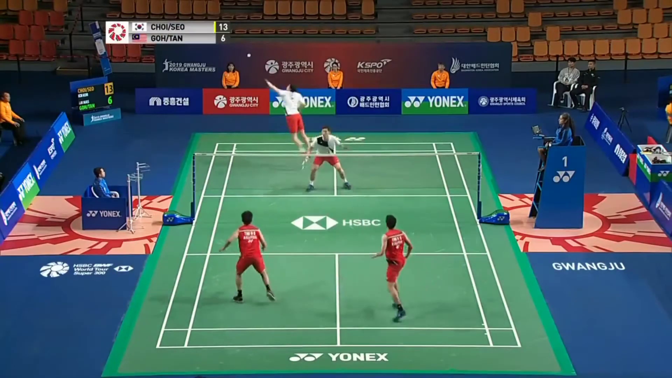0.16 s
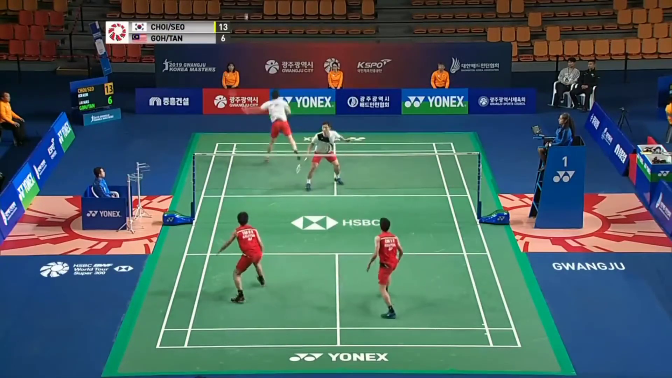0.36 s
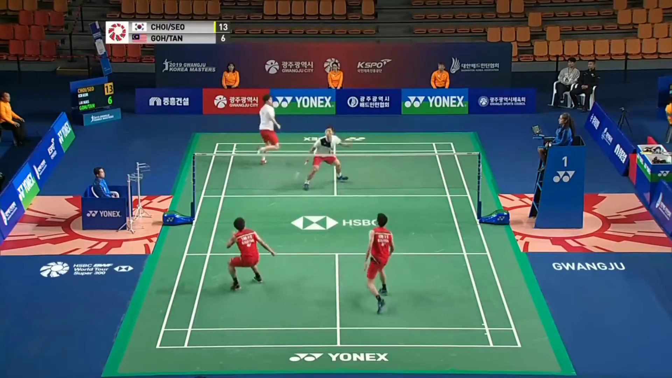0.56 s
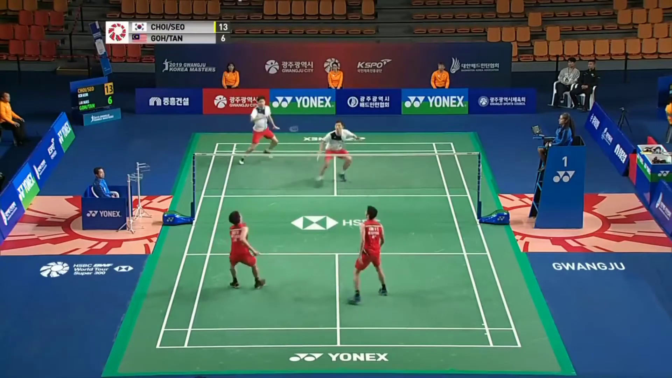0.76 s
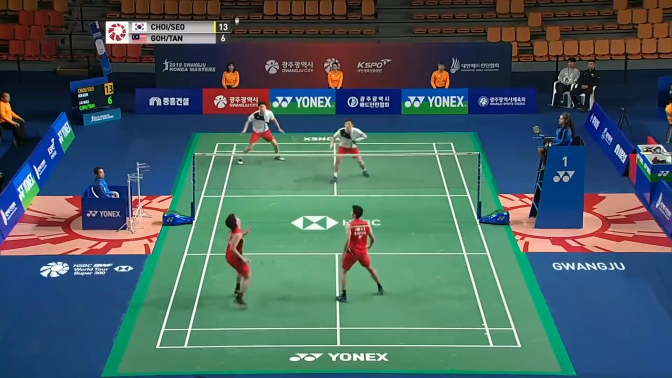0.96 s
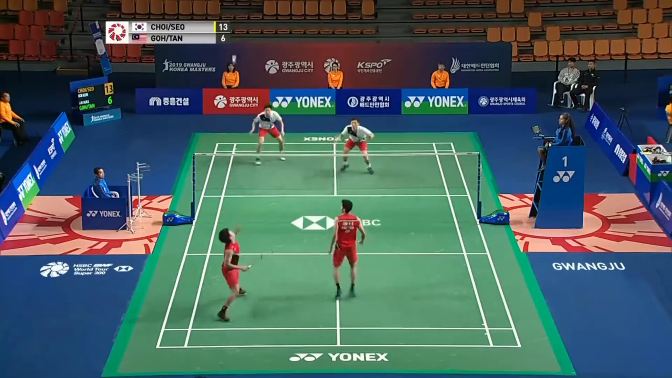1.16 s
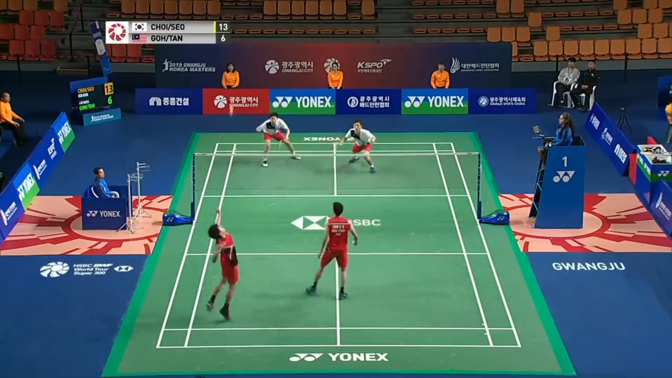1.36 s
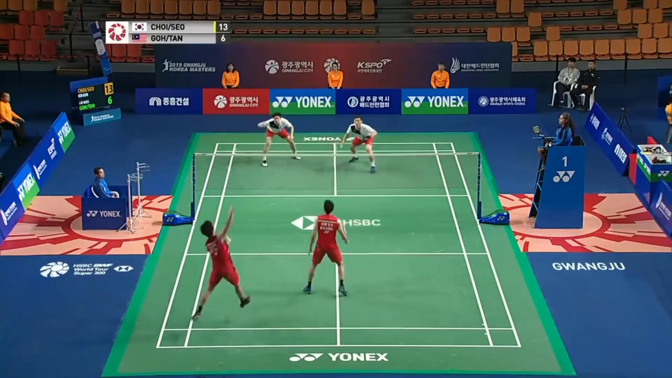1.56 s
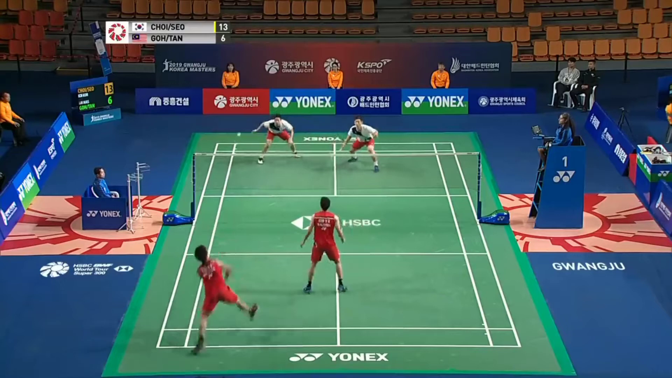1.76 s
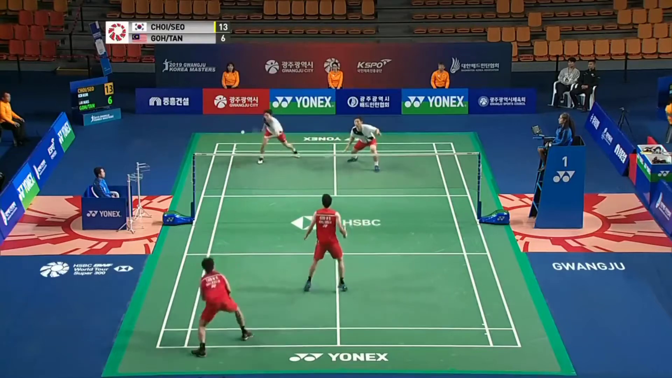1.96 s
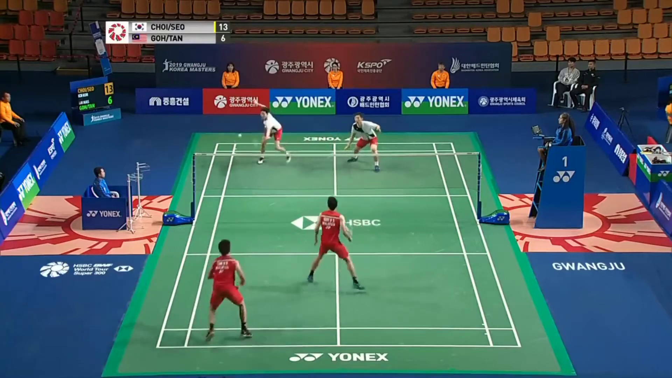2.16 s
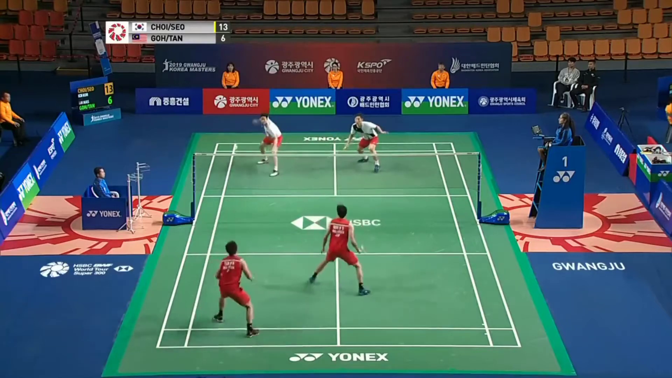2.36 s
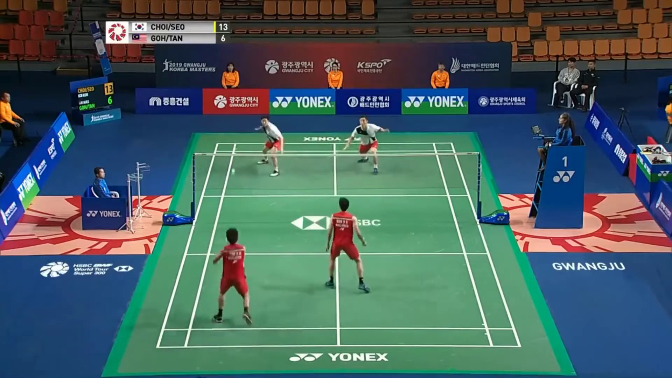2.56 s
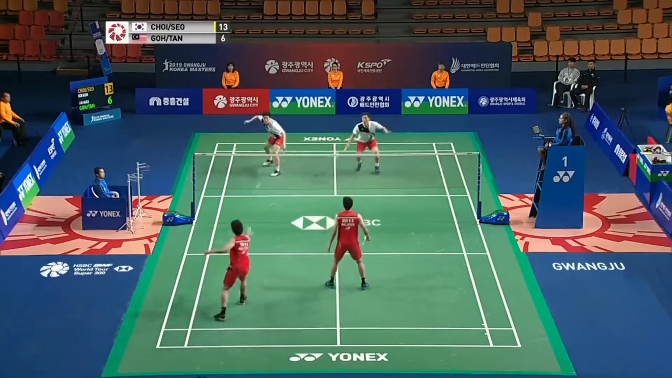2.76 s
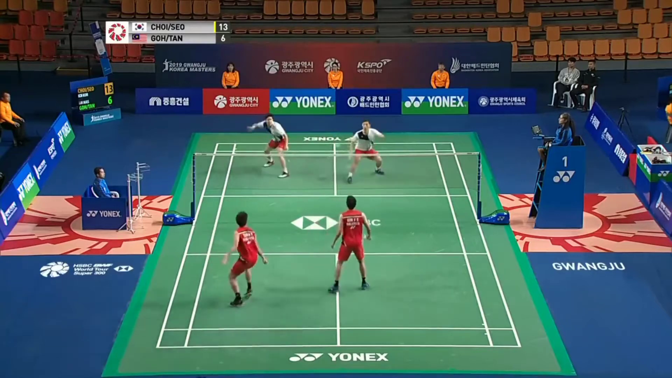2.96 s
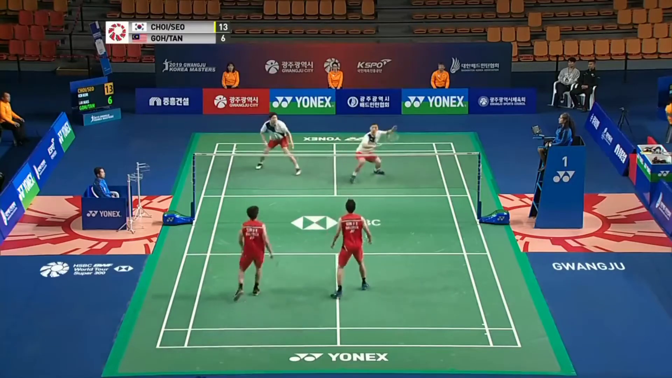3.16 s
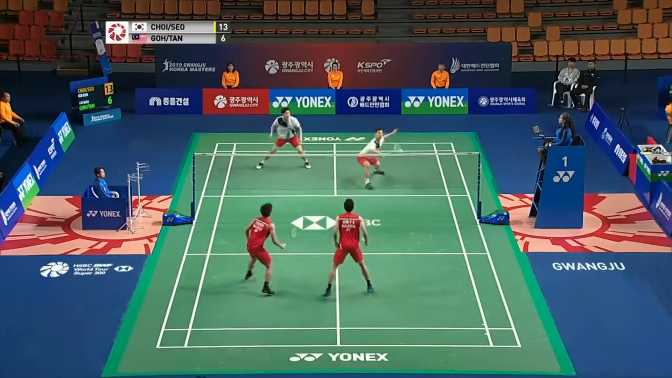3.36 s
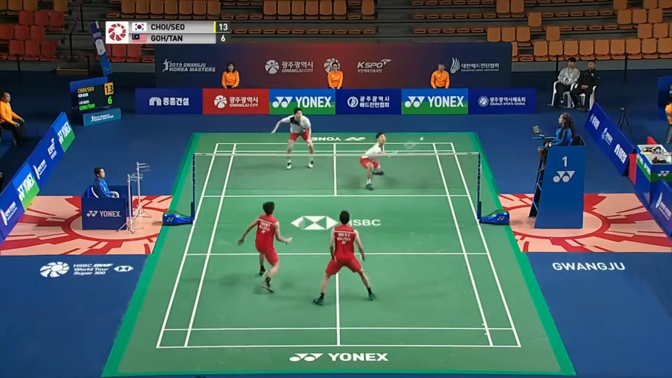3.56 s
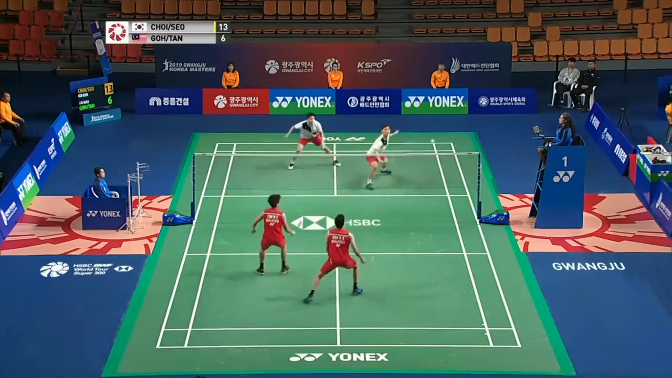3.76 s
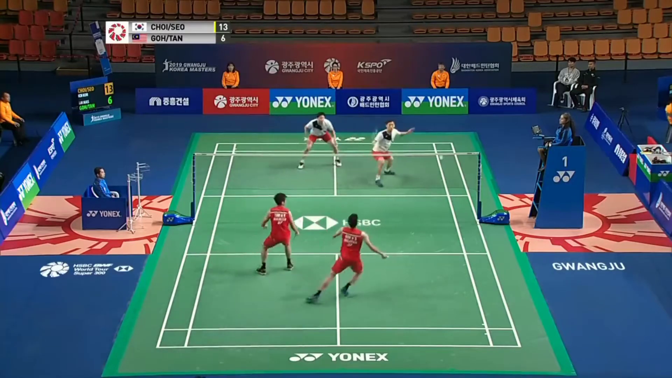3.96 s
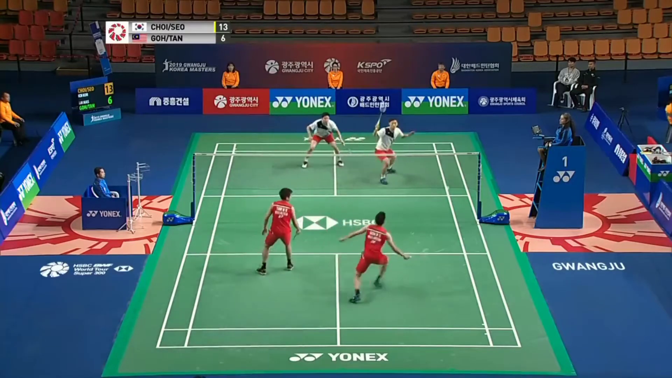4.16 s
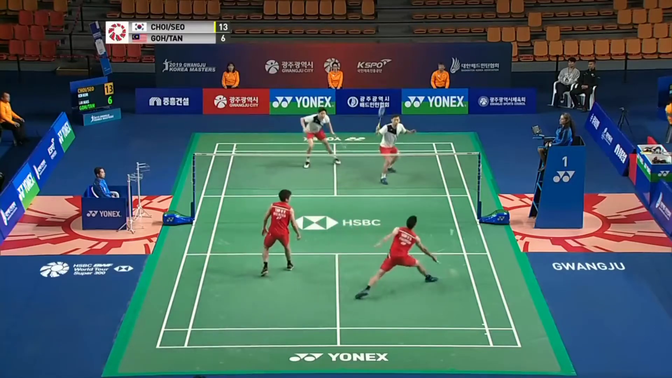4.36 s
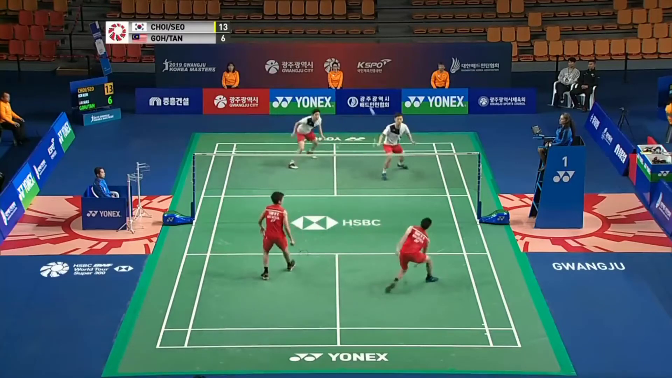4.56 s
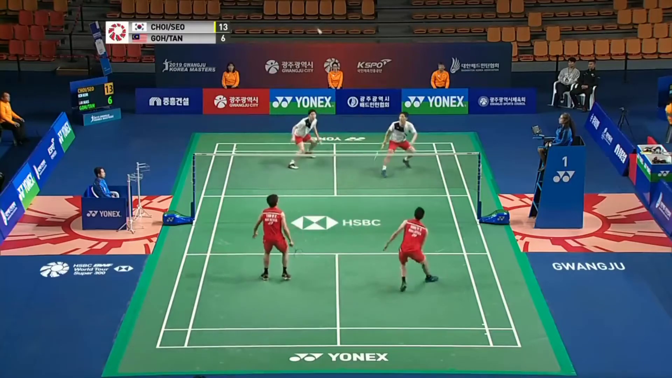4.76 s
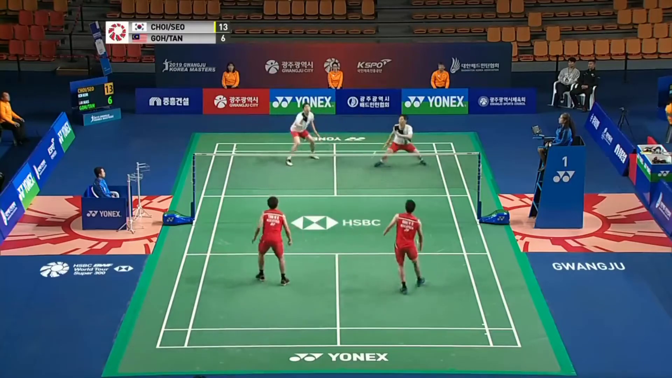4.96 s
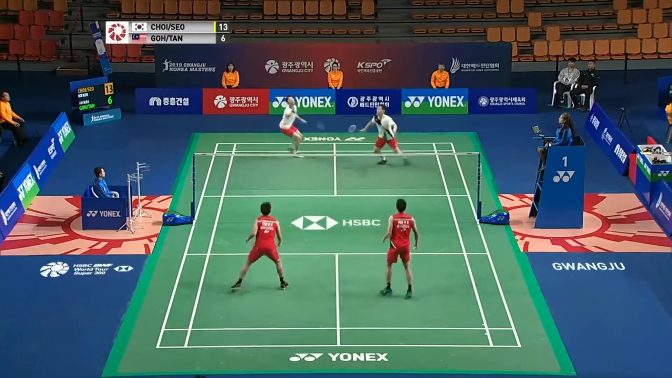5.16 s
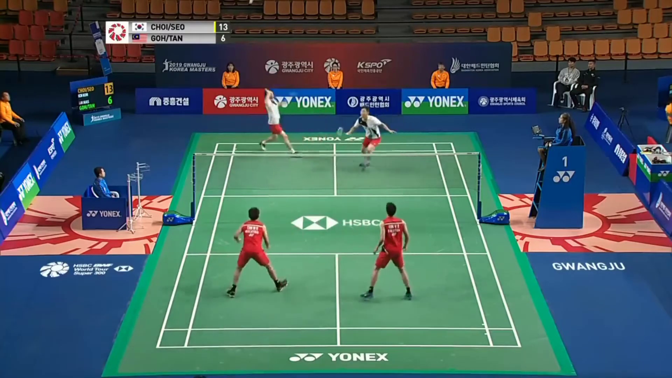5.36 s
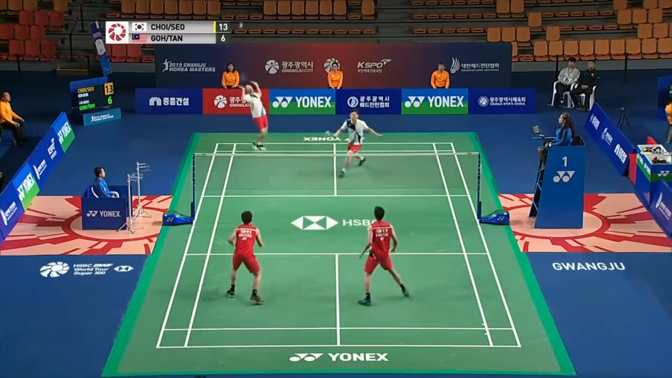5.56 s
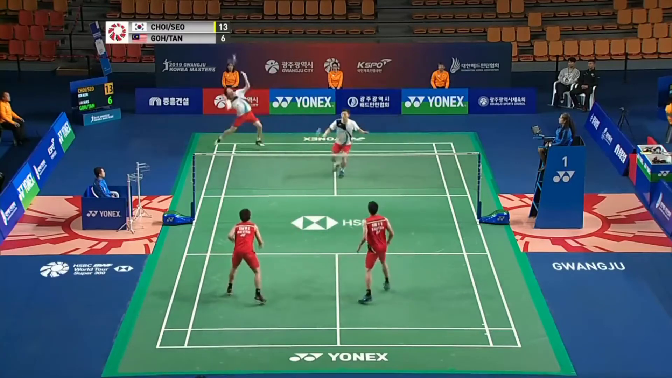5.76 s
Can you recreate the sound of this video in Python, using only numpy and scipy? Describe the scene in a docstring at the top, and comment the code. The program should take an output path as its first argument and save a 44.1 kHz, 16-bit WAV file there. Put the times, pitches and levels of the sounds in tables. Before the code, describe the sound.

Badminton rackets crack against a shuttlecock in a big reverberant hall, one stroke much louder, with shoe squeaks and light footfalls between.

```python
"""A large arena: a fast badminton doubles rally, heard by two court-side microphones mixed to mono.
Strokes crack, thump the frame and ring the strings, then sound again some 20 ms later at the far microphone.
Some swings whistle, as noise gliding upward; squeaks, footfalls and small clicks, some perhaps strokes echoed
off the walls, sound at both microphones in turn. Filtered noise makes the scuffs, floor booms and far knocks;
a diffuse noise tail is the hall's answer, and steady noise the soft ventilation rumble."""
import sys
import numpy as np
from scipy import signal
from scipy.fft import rfft, irfft
from scipy.io import wavfile

SR = 44100
rng = np.random.default_rng(int(sys.argv[2]) if len(sys.argv) > 2 else 0)


def wav_record(signal):
    """Record a signal, one row per channel, as 16-bit PCM in the file named by sys.argv[1]."""
    frames = np.transpose(np.atleast_2d(signal))
    bounded = np.clip(frames, -1, 1)
    # unit amplitude maps onto the largest positive 16-bit level
    quanta = np.round(bounded * 32767).astype(np.int16)
    wavfile.write(sys.argv[1], SR, quanta)


N = 255817
T = np.arange(int(.4 * SR)) / SR  # time within one short sound (s)


def undb(db):
    """Decibels to gain."""
    return np.exp(np.asarray(db) * np.log(10) / 20)


def add(track, s, sound):
    """Mix a sound into a track from time s on, trimmed to the track."""
    start = int(round(s * SR))
    lo, hi = max(start, 0), min(start + len(sound), N)
    track[lo:hi] += sound[lo - start:hi - start]


def delayed(x, s):
    """The same short sound, s later."""
    return np.interp(T - round(s * SR) / SR, T, x, left=0)


def burst(x, db):
    """Give a short sound the energy of 10 ms at this rms level."""
    return x * undb(db) * np.sqrt(.01 * SR / np.sum(x ** 2))


def colour(x, points, tilt_db=0, size=4096):
    """Minimum-phase filter through (f/Hz, level/dB) points, tilted in dB per octave about 1 kHz."""
    octave = np.log2(np.maximum(np.fft.rfftfreq(size, 1 / SR), 10))
    hz, db = np.transpose(points)
    hinge = np.clip(octave - np.log2(1000), -2, 3)  # the tilt levels off below 250 Hz and above 8 kHz
    response_db = np.interp(octave, np.log2(hz), db) + tilt_db * hinge
    cepstrum = irfft(np.log(undb(response_db)))
    # fold the cepstrum onto positive time, so that nothing sounds before the input
    cepstrum[1:size // 2] *= 2
    cepstrum[size // 2 + 1:] = 0
    kernel = irfft(np.exp(rfft(cepstrum)))
    return signal.fftconvolve(x, kernel)[:len(x)]


def fading(t60):
    """Noise that dies away by 60 dB in t60 seconds, with unit energy."""
    x = rng.standard_normal(len(T)) * undb(-60 * T / t60)
    return x / np.sqrt(np.sum(x ** 2))


def wander(knots):
    """A random line drawn through the knot times."""
    return np.interp(T, knots, rng.standard_normal(len(knots)))


def swell(length):
    """A smooth rise and fall that peaks one length in."""
    return np.exp(-2 * (2 * (T - length) / length) ** 2)


def impact(rattle_db, rattle_t60, scatter_db, scatter_t60, flex_hz=2400, size=512):
    """A push spread by flexing (its lows lag a little), a short rattle, and scatter from the floor around it."""
    out = undb(rattle_db) * fading(rattle_t60) + undb(scatter_db) * fading(scatter_t60)
    hz = np.fft.rfftfreq(size, 1 / SR)
    flex_phase = -8 * np.arctan(np.tan(np.pi * hz / SR) * SR / np.pi / flex_hz)
    add(out, 0, irfft(np.exp(1j * flex_phase)))
    return out


# Upper membrane modes of the string bed: f/Hz, level before the stroke's own offset/dB, t60/s
STRING_MODES = [(2110, 0, .17), (2990, -6, .24), (3060, -11, .2), (3470, -12, .15), (3760, -16, .12),
                (4665, -9, .05)]


def strings(pitch_hz, upper_db):
    """The string bed rings at its fundamental and in its upper membrane modes, each slightly detuned."""
    modes = [(pitch_hz, -2, .22)]  # the fundamental
    modes += [(hz, db + upper_db, decay) for hz, db, decay in STRING_MODES]
    ring = np.zeros(len(T))
    for hz, db, decay in modes:
        detuned_hz = hz * (1 + .004 * rng.standard_normal())
        ring += undb(db - 60 * T / decay) * np.sin(2 * np.pi * detuned_hz * T)
    return ring


# Racket strokes: t/s, near microphone level/dB, lag to the far one/s, far microphone level/dB,
# nominal string f/Hz, string ring relative level/dB, crack brightness/(dB per octave),
# hall send before the mix/dB, upper string modes relative level/dB
RACKET_STROKES = [(0.2728, -31.5, 0.02, -30, 1335, -4, 2.5, 1, -3.5),
                  (1.6384, -15.5, 0.0236, -16.5, 1392, -15.5, 2.7, -10.5, 0),
                  (2.1054, -35, 0.019, -32.5, 1287, -2, 4.5, 3.5, -28),
                  (2.786, -36, .0250, -35, 1368, -3.5, 6.5, 1, -6),
                  (3.2180, -31.5, 0.013, -33, 1162, -14, 8, -2, -23),
                  (4.355, -37.5, 0.0165, -35.5, 1450, -14.5, 5.5, 1.5, -19),
                  (4.4960, -32, 0.018, -25.5, 1294, -7, 6, -4, -5.5)]
# Spectrum of cork on strings: f/Hz, level/dB
CORK_CRACK = [(60, -63), (140, -40), (270, 5.5), (500, -4), (800, 5), (1300, 4), (1900, -2), (2550, -7),
              (3000, -9), (4100, -17), (4700, -18), (5600, -25), (10000, -46), (15000, -67)]
# Spectrum of the frame's thump: f/Hz, level/dB
FRAME_THUMP = [(60, -36.5), (170, -5), (300, 7.5), (550, 8.5), (900, -8), (3000, -35.5), (12000, -89)]
BOARDS_SHARE = 0.63  # the echo off the side boards arrives at this share of the lag between the microphones
# a stroke that rings the strings more also shakes the frame more (dB, dB per dB)
THUMP_DB, THUMP_PER_RING = -2, 0.51


def rackets(boards_db=-6, bounce_s=0.0042, bounce_db=-1, ring_hall_db=-7):
    """Each stroke reaches the near microphone directly and off the boards, then the far one directly and off the floor."""
    direct, feed = np.zeros(N), np.zeros(N)
    for s, near_db, lag, far_db, pitch_hz, ring_db, tilt_db, hall_db, upper_db in RACKET_STROKES:
        # a close stroke is a clean crack; one with more hall in it also has more early scatter
        near, boards, far, bounce = (
            impact(rattle_db=1, rattle_t60=.026, scatter_db=hall_db + 3, scatter_t60=.15) for _ in range(4))
        near = near + undb(boards_db) * delayed(boards, BOARDS_SHARE * lag)
        far = far + undb(bounce_db) * delayed(bounce, bounce_s)
        for delay, db, push in ((0, near_db, near), (lag, far_db, far)):
            crack = burst(colour(push, CORK_CRACK, tilt_db), db)
            thump = burst(colour(push, FRAME_THUMP), db + THUMP_DB + THUMP_PER_RING * ring_db)
            ring = burst(strings(pitch_hz, upper_db), db + ring_db)
            add(direct, s + delay, crack + thump + ring)
            # the string bed radiates along the court, so less of its ring fills the hall
            add(feed, s + delay, (crack + thump + undb(ring_hall_db) * ring) * undb(hall_db))
    return direct, feed


# The racket head cutting the air: t at loudest/s, rise length/s, f at loudest/Hz, level/dB
RACKET_SWINGS = [(0.257, 0.036, 475, -41), (1.633, 0.025, 1093, -29), (3.208, 0.022, 1174, -44),
                 (4.341, .026, 880, -47)]


def swings(eddy_hz=150):
    """Vortices shed by the frame whistle upward as the racket speeds up."""
    out = np.zeros(N)
    lowpass = signal.butter(2, eddy_hz, fs=SR, output="sos")
    for s, length, hz, db in RACKET_SWINGS:
        noise = rng.standard_normal(len(T)) + 1j * rng.standard_normal(len(T))
        eddies = signal.sosfilt(lowpass, noise)
        speed = np.minimum(T / length, 1.4)  # 1 at the loudest moment
        phase = 2 * np.pi * np.cumsum(hz * (1 + speed) / 2) / SR
        whistle = np.real(eddies * np.exp(1j * phase))
        add(out, s - length, burst(swell(length) * whistle, db))
    return out


# Rubbing noise, for squeaks and scuffs alike: multiple of the squeak's start f or scuff's centre f, level/dB
RUBBING = [(.1, -6), (.4, 8), (.75, 6), (1, 8), (1.5, 1.5), (2.5, -9.5), (4, -32), (6, -70), (9, -88)]


def chirp(length, start_hz, end_hz, db, overtone_db):
    """Stick-slip of a sole: a short, unsteady glide with overtones, inside the noise of the rubbing."""
    waver, rough, rub_db = .021, .35, -30  # pitch and level unsteadiness (fractions), noise (dB)
    knots = T[::40]
    pitch_walk, grip = wander(knots), wander(knots)
    glide_hz = np.interp(T, [length / 2, 3 * length / 2], [start_hz, end_hz])
    phase = 2 * np.pi * np.cumsum(glide_hz * (1 + waver * pitch_walk)) / SR
    overtones = np.sin(2 * phase) + undb(-17) * np.sin(3 * phase)
    tone = np.sin(phase) + undb(overtone_db) * overtones
    rub = colour(rng.standard_normal(len(T)), [(k * start_hz, gain) for k, gain in RUBBING])
    # a hard slip locks into a clean tone, so the noise grows more slowly than the squeal
    noise = undb(rub_db + db / 2) * rub / np.std(rub)
    return swell(length) * undb(db) * (1 + rough * grip) * tone + np.sqrt(swell(length)) * noise


# Rubber sticking and slipping: t at loudest/s, rise length/s, nominal start f/Hz, nominal end f/Hz,
# near microphone nominal peak level/dB, lag to the far one/s, far microphone nominal peak level/dB,
# overtone relative level/dB
SHOE_SQUEAKS = [(0.062, 0.023, 2850, 2240, -39.5, .019, -38.5, -24),
                (.662, 0.023, 2900, 2590, -38, 0.018, -32, -41),
                (1.239, .015, 2326, 2430, -38.5, .019, -35, -13),
                (1.734, 0.039, 2020, 1890, -55, 0.022, -39, -10.5),
                (2.398, .028, 2650, 2050, -36, .026, -35, -25),
                (2.44, 0.015, 2060, 1650, -40, 0.023, -47, -23),
                (3.876, .013, 2396, 2270, -30.5, .02, -18.5, -15.5),
                (3.883, .011, 2180, 2430, -30, 0.029, -40, -14),
                (3.921, 0.013, 2320, 2310, -39, .02, -32, -3.5),
                (4.869, 0.038, 1880, 1742, -48, 0.017, -52, -35),
                (5.621, 0.011, 1242, 1840, -37, 0.015, -35.5, -14)]


def squeaks():
    """Every squeak is heard twice, once at each microphone."""
    out = np.zeros(N)
    for s, length, start_hz, end_hz, near_db, lag, far_db, overtone_db in SHOE_SQUEAKS:
        for delay, db in ((0, near_db), (lag, far_db)):
            add(out, s + delay - length, chirp(length, start_hz, end_hz, db, overtone_db))
    return out


# Spectrum of the sprung floor: multiple of the boom f, level/dB
SPRUNG_FLOOR = [(.2, -20), (.4, -8.5), (.6, -1), (1, -1.5), (1.5, -9), (2.4, -12.5), (5.5, -21.5),
                (14, -39), (45, -74), (110, -95)]
BOOM_RISE_S, BOOM_T60_S = 0.0037, 0.39


def boom(boom_hz, db):
    """A low boom, as of a sprung floor that takes a weight and rings: noise that rises fast and fades."""
    load = fading(BOOM_T60_S) * (1 - np.exp(-T / BOOM_RISE_S))
    return burst(colour(load, [(k * boom_hz, gain) for k, gain in SPRUNG_FLOOR]), db)


# Footfalls and small clicks, some perhaps echoes of strokes off the walls: t/s, near microphone click level/dB,
# lag to the far one/s, far microphone click level/dB, low boom level/dB, boom f/Hz
FOOTFALLS_AND_CLICKS = [(.434, -37, .0225, -38, -36, 138), (.487, -36, .0235, -34.5, -28, 135),
                        (.535, -56, 0.023, -42, -46, 130), (.743, -45, 0.036, -45, -41, 133),
                        (0.85, -45, .0225, -45, -53, 120), (1.185, -48, 0.024, -51.5, -83, 130),
                        (1.277, -50, 0.024, -46, -50, 120), (1.733, -44.5, .021, -42.5, -62, 120),
                        (1.791, -45, 0.019, -41, -49, 123), (1.883, -35, .025, -33.5, -35, 140),
                        (1.892, -34, 0.021, -35, -48, 110), (1.959, -64, 0.033, -58, -43, 99),
                        (2.229, -55, .022, -43, -43, 110), (2.321, -47, 0.024, -48, -43, 102),
                        (2.425, -45, 0.024, -46, -39, 111.5), (2.775, -60, .022, -62, -44, 113),
                        (2.934, -43, .026, -39, -52, 110.3), (3, -40.5, 0.017, -39.5, -39.5, 99),
                        (3.054, -47.5, 0.02, -70, -42.5, 100.6), (3.137, -62, 0.024, -50, -45, 121),
                        (3.807, -50, .022, -49.5, -47.5, 129), (3.882, -45, 0.023, -52, -35.5, 92),
                        (4.392, -44, .022, -46, -33, 108), (4.442, -46, .022, -48, -51, 90),
                        (4.5209, -45, 0.024, -35, -42, 90), (4.611, -39.5, 0.02, -42, -43, 108),
                        (4.9138, -45.5, .019, -44.5, -37, 116), (5.275, -54, .022, -49, -42.5, 131.6),
                        (5.4301, -51.5, 0.021, -47.5, -39, 105)]
# Spectrum of a tap or click, for these and the light steps: f/Hz, level/dB
TAP_SPECTRUM = [(50, -15.5), (150, -1.5), (450, 0.5), (900, -2.5), (1600, -9.5), (3000, -12.5),
                (5000, -16.5), (10000, -39.5), (15000, -102)]
# a click with less boom under it is brighter (dB per octave, and its rise per dB of click over boom)
TAP_TILT_DB, TILT_PER_DB = -0.44, 0.02
BOOM_LAG_S = 0.01  # the boom follows the click


def footfalls_and_clicks():
    """A tap or click is heard at one microphone and then the other, with a low boom under it."""
    out = np.zeros(N)
    for s, near_db, lag, far_db, boom_db, boom_hz in FOOTFALLS_AND_CLICKS:
        for delay, db in ((0, near_db), (lag, far_db)):
            tilt_db = TAP_TILT_DB + TILT_PER_DB * max(db - boom_db, 0)
            push = impact(rattle_db=-3.5, rattle_t60=0.05, scatter_db=-4.0, scatter_t60=0.24)
            add(out, s + delay, burst(colour(push, TAP_SPECTRUM, tilt_db), db))
        add(out, s + BOOM_LAG_S, boom(boom_hz, boom_db))
    return out


# Soles sliding as a player brakes or pushes off: t at loudest/s, rise length/s, centre f/Hz,
# rms level at loudest/dB
SOLE_SCUFFS = [(0.123, .07, 2530, -52.5), (0.627, .055, 2300, -40.5), (0.775, 0.15, 3000, -54),
               (0.906, .11, 2700, -47.5), (1.004, 0.097, 1760, -50), (1.271, .07, 3180, -48),
               (2.388, 0.12, 2290, -52), (2.523, 0.16, 3650, -55.5), (3.133, 0.13, 2900, -51.5),
               (3.404, 0.093, 3040, -49), (3.567, 0.24, 3000, -50.5), (3.876, .045, 3040, -47),
               (3.983, 0.099, 3260, -48.5), (4.1, 0.13, 3200, -54), (4.439, 0.085, 1830, -45),
               (5.1, 0.2, 3670, -61.5), (5.537, 0.048, 2850, -46), (5.588, 0.07, 3400, -48),
               (5.672, .075, 3170, -52.5)]


def scuffs():
    """A sliding sole makes a dense run of tiny uneven slips."""
    out = np.zeros(N)
    grain_db, knots = 3, T[::100]  # unevenness of the slips (dB), and its knot times
    for s, length, hz, db in SOLE_SCUFFS:
        slips = rng.standard_normal(len(T)) * undb(grain_db * wander(knots))
        rub = colour(slips, [(k * hz, gain) for k, gain in RUBBING])
        add(out, s - length, undb(db) * swell(length) * rub / np.std(rub))
    return out


# before each stroke the light steps and small hops soften: for how long (s), by how much (dB)
SET_S, SET_DB = .17, -11


def readiness_db(s):
    """Light feet fall quieter while the players wait for a stroke."""
    return SET_DB * any(0 < stroke[0] - s < SET_S for stroke in RACKET_STROKES)


def shuffling(count=90, mean_db=-55.5, spread_db=3):
    """Four players' lightest steps, one at random in each equal time slot and blurred by distance."""
    out = np.zeros(N)
    for slot, (place, size, bright) in enumerate(rng.random((count, 3))):
        s = (slot + place) / count * N / SR
        push = impact(rattle_db=12.0, rattle_t60=0.036, scatter_db=11.5, scatter_t60=0.065)
        tap = colour(push, TAP_SPECTRUM, 2.4 * bright)
        add(out, s, burst(tap, mean_db + spread_db * (2 * size - 1) + readiness_db(s)))
    return out


def soft_landings(count=18, mean_db=-54, spread_db=3, boom_hz=110):
    """Small hops stir the floor, one at random in each equal time slot."""
    out = np.zeros(N)
    for slot, (place, size) in enumerate(rng.random((count, 2))):
        s = (slot + place) / count * N / SR
        add(out, s, boom(boom_hz, mean_db + spread_db * (2 * size - 1) + readiness_db(s)))
    return out


# Dull knocks far off in the hall, heard mostly as reverberation: t/s, level before the mix/dB
FAR_KNOCKS = [(3.2009, -35.5), (3.219, -35.5), (3.2668, -37), (4.913, -45.5), (5.612, -42.5),
              (5.666, -48.5)]
# Spectrum of a knock: f/Hz, level/dB
KNOCK_SPECTRUM = [(100, -13), (350, -5.5), (600, -3), (790, 0), (1200, 0.5), (1900, -9.5), (4000, -20),
                  (8000, -39), (14000, -75)]


def knocks():
    """Distant blows, blurred by many reflections."""
    out = np.zeros(N)
    for s, db in FAR_KNOCKS:
        push = impact(rattle_db=-10.0, rattle_t60=0.074, scatter_db=11.5, scatter_t60=0.41)
        add(out, s, burst(colour(push, KNOCK_SPECTRUM), db))
    return out


# Reverberation of the hall by band: f/Hz, t60/s, level/dB
HALL_BANDS = [(60, 3.6, -7.5), (195, 1.5, -5), (452, 1.54, 0), (1170, 2.73, -4), (2220, 2.88, -3),
              (5000, 1.2, -4), (10000, 0.67, -1.5), (16000, .5, -11)]


def hall(x, build_s=0.0076):
    """A diffuse noise tail that builds up and then fades, each band at its own rate and the top fastest."""
    t = np.arange(2 * SR) / SR
    hz, t60, db = np.transpose(HALL_BANDS)
    octave = np.log2(np.maximum(np.fft.rfftfreq(len(t), 1 / SR), 1))
    noise = rfft(rng.standard_normal(len(t)))
    tail = np.zeros(len(t))
    for band, decay, gain in zip(np.eye(len(hz)), t60, db):
        share = np.interp(octave, np.log2(hz), band)  # neighbouring bands crossfade
        tail += irfft(noise * share) * undb(gain - 60 * t / decay)
    tail *= (1 - np.exp(-t / build_s)) / np.sqrt(SR)
    return signal.fftconvolve(x, tail)[:N]


# Spectrum of the ventilation and the still stands: f/Hz, relative level per Hz/dB
AIR_SPECTRUM = [(22, -14), (42, -4), (65, 2.5), (130, -3), (250, -1), (600, -2.5), (1200, -9),
                (2400, -12.5), (4500, -23), (8000, -35.5), (11000, -48), (15000, -64)]
AIR_DB = -56.5  # rms level before the broadcast chain


def air():
    """The arena's steady rumble, as filtered noise."""
    x = colour(rng.standard_normal(N), AIR_SPECTRUM)
    return x / np.std(x) * undb(AIR_DB)


def scene():
    """Rackets, feet, clicks and far knocks, each but the swings with its share of the hall, over the air."""
    hits, hit_feed = rackets()
    chirps = squeaks()
    taps = footfalls_and_clicks() + shuffling() + soft_landings()
    slides = scuffs()
    far = knocks()
    direct = hits + swings() + taps + chirps + slides + undb(3.5) * far
    feed = undb(4.0) * hit_feed + undb(2.5) * taps + undb(14.5) * far
    feed += undb(-11.5) * chirps + undb(-9.5) * slides
    mono = direct + hall(feed) + air()
    return np.array([mono, mono])  # both channels alike


TOP_HZ = 15000


def record(dry):
    """The broadcast chain cuts the deep rumble and the top."""
    rumble_cut = signal.butter(3, 42, "high", fs=SR, output="sos")
    top_cut = signal.ellip(8, .2, 70, TOP_HZ, fs=SR, output="sos")
    return signal.sosfilt(top_cut, signal.sosfilt(rumble_cut, dry))


dry = scene()
out = record(dry)
wav_record(out)
```